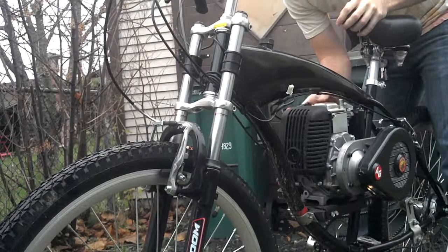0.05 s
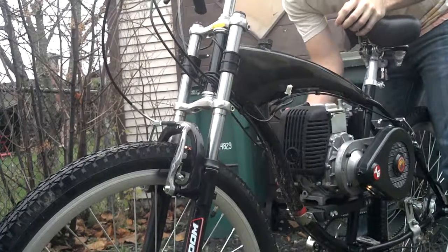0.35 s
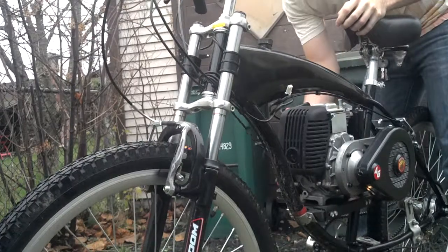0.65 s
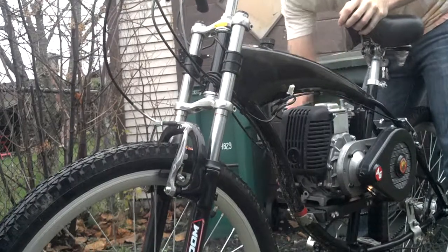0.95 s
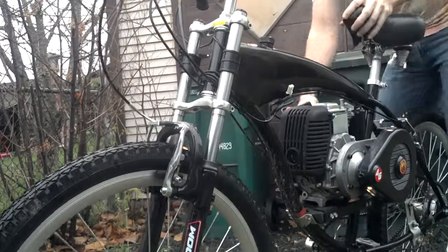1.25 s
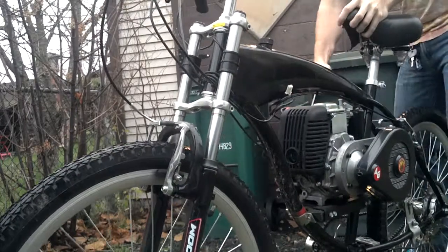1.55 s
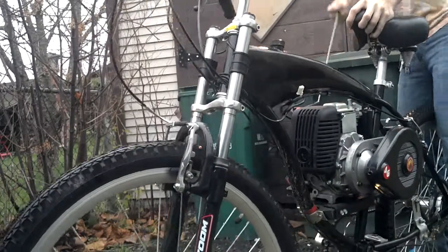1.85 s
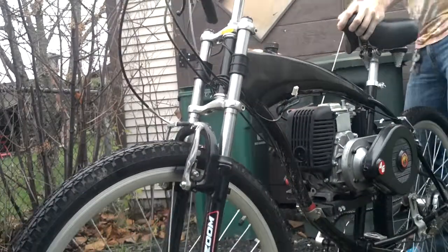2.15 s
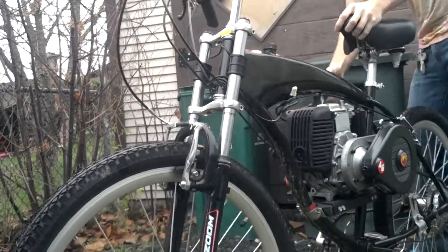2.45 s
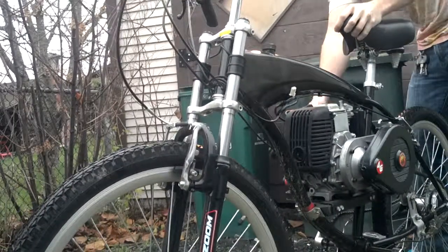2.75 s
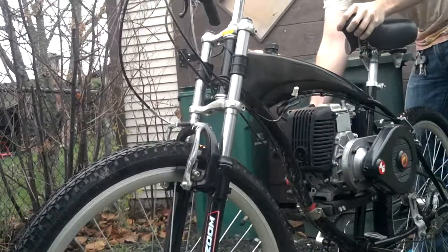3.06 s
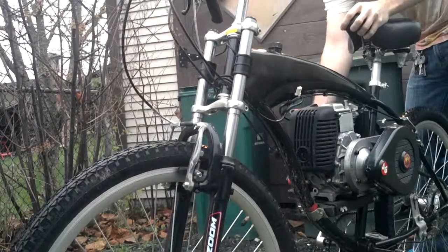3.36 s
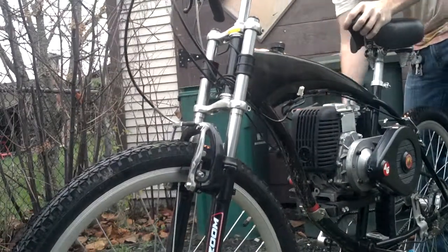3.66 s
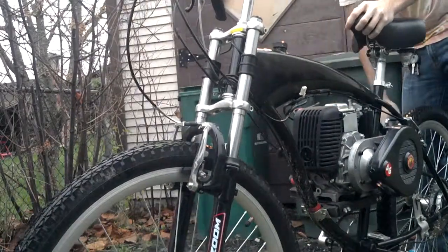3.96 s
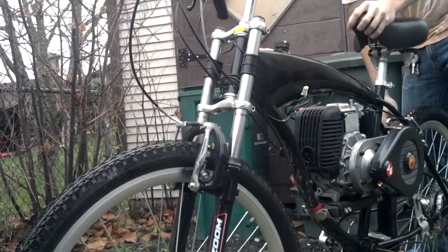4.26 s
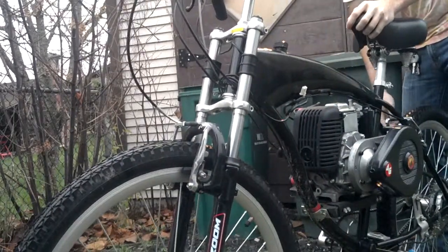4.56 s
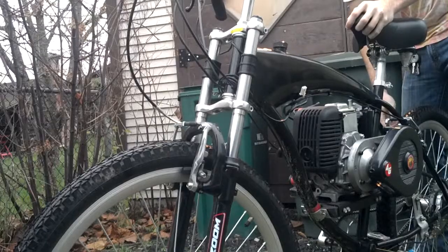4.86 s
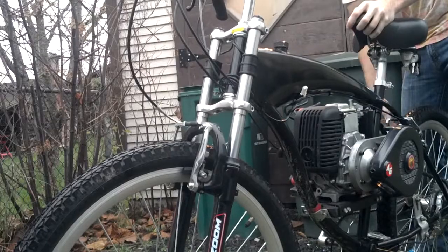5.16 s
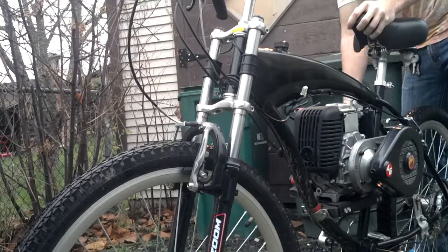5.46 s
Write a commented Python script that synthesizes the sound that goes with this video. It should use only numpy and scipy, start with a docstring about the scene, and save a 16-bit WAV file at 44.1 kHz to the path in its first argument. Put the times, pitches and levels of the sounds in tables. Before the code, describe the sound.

In a quiet yard with a distant motor hum, a hand makes a few light clicks on a motorized bicycle. The starter cord scrapes and whirrs out, and the small four-stroke engine catches with a sharp kick. Close by, it putters with ticking valves and a metallic clatter, revs up, then slows almost to a stall with sharp clacks before picking up weakly.

```python
"""A hand clicks at the controls and takes up a starter cord, over a quiet yard and a far machine's hum.
The cord whirrs out and a small four-stroke bicycle engine catches, revs up, nearly stalls with sharp
clacks and catches again. Each cycle puffs gas through the muffler and pipe, knocks the crankcase and
clicks two valves against the finned head, over the clatter of loose parts."""
import sys
import numpy as np
from scipy import signal
from scipy.fft import rfft, irfft, next_fast_len
from scipy.io import wavfile
from scipy.ndimage import uniform_filter1d

SR = 44100
rng = np.random.default_rng(int(sys.argv[2]) if len(sys.argv) > 2 else 0)


def put_to_file(sound):
    """Save the sound as 16-bit audio at rate SR, in the file named by the first command-line argument."""
    columns = np.atleast_2d(sound).T  # one column per channel
    safe = np.clip(columns, -1, 1)
    whole_steps = np.round(safe * 32767)
    wavfile.write(sys.argv[1], SR, whole_steps.astype(np.int16))


N = 242991
TIME = np.arange(N) / SR
FFT_SIZE = next_fast_len(N + 8192, real=True)
FREQ = np.maximum(np.arange(FFT_SIZE // 2 + 1) * SR / FFT_SIZE, 1)

# engine speed: t/s, four-stroke cycle rate/Hz
SPEED = [(1.9, 22.44), (2.05, 10.06), (2.16, 20.66), (2.41, 25.47), (2.81, 22.22), (3.28, 22.73),
         (3.72, 27.46), (4.32, 29.22), (4.71, 26.1), (5.16, 9.24), (5.35, 15.97), (5.51, 13.52)]
# throttle moves: t/s, opening/0-1
THROTTLE = [(2.16, 0.07), (2.46, 0.32), (2.72, 0.35), (3.28, 0.7), (4.58, 0.83), (4.78, 0.3), (4.92, 0.3),
            (5.02, 0.34), (5.14, 0.3), (5.29, 0.97), (5.43, .75), (5.51, 0.5)]
# muffler response with hot gas: f/Hz, gain/dB
MUFFLER_EQ = [(30, -51), (58, -24), (72, -47), (88, -9.5), (106, -12.5), (122, -1.5), (139, 2.5),
              (152, -1.5), (174, -22), (205, -12.5), (260, -28), (600, -50)]
# exhaust pipe resonances: f/Hz, width/Hz, gain/dB
PIPE_MODES = [(221.6, 23, 0.5), (249.3, 22, 5), (329, 71, 0.5), (389.5, 9.9, 6.5), (552, 42, -0.5),
              (848, 71, 1)]
# the bare pressure crack of a puff: f/Hz, gain/dB
POP_EQ = [(50, -51), (130, -33), (250, 8.5), (900, -4), (2000, -13), (4500, -18), (12000, -33)]
# piston, crank and gears hitting the crankcase: position/cycles, relative level/dB
KNOCKS = [(.03, 0), (.23, -9), (.37, -2.5), (.76, -9), (.87, -1.5), (.96, -8)]
# crankcase and cover resonances: f/Hz, width/Hz, gain/dB
CASING_MODES = [(784, 7.3, -3), (834, 15, 0.5), (878, 25, 0), (995, 33, -4), (1135, 33, -4.5),
                (1178, 36, 4), (1252, 38, 0.5), (1331, 84, 7.5), (1371, 22, 7.5), (1548, 9.3, -2.5),
                (1830, 470, -2)]
# broad tone of metal contacts: f/Hz, gain/dB
METAL_EQ = [(150, -58), (420, 7), (1200, 1), (1630, -5.5), (2200, 4), (2700, -4), (3300, -3), (4600, -2),
            (7000, -4.5), (8700, -11), (11000, -15.5), (12000, -18), (15500, -23)]
# light taps of rockers and push rods: position/cycles, level against the exhaust valve/dB
TAPS = [(.1, -7), (.18, -9), (.345, -6), (.48, -9), (.67, -6), (.83, -8), (.92, -10)]
# cylinder head and cooling fin resonances: f/Hz, width/Hz, gain/dB
HEAD_MODES = [(3150, 25, 0), (3222, 36, 11), (3497, 97, -1), (3750, 110, -3), (4230, 70, -6),
              (4440, 130, -8), (6185, 35, -1), (6440, 55, 5), (6530, 40, 2), (6730, 36, 3), (7000, 120, -5)]
# harmonics that sing on a resonance: multiple of the cycle rate, f/Hz, width/Hz, level/dB, roughness/0-1
SINGING = [(12, 335, 60, -38, .18), (15, 385, 40, -51, .4), (16, 390, 35, -46, .3), (17, 388, 30, -45, .3),
           (28, 764, 16, -40, .35), (28, 808, 22, -37, .35), (31, 890, 30, -41, .4),
           (40, 1152, 44, -32.5, .6), (47, 1360, 30, -36, .7)]
# valve snaps and exhaust spits: t/s, relative rattle level/dB, rattle t60/s, snap/dB, cover ring/dB
CLACKS = [(4.814, -28, .04, -40, -38), (4.862, -30, .03, -42, -29), (4.913, -31, .03, -42, -34),
          (4.972, -25, .035, -32, -36), (5.038, -23, .04, -32, -35), (5.121, -25.5, .03, -34, -38),
          (5.192, -23, .05, -27, -21), (5.22, -28, .035, -41, -29), (5.262, -33, .03, -44, -27),
          (5.277, -23, .045, -29, -31), (5.298, -24, .035, -38, -37), (5.343, -28, .05, -36, -28),
          (5.408, -27, .06, -36, -32), (5.428, -24, .035, -40, -38), (5.498, -23.5, .04, -31, -33)]
# bright rattle of a clack: f/Hz, gain/dB
RATTLE_EQ = [(1000, -27), (3000, -20), (6500, 21), (9000, 5), (12000, -19), (15500, -7)]
# the snap at the front of a hit: f/Hz, gain/dB
SNAP_EQ = [(300, -25), (1200, -3), (3500, 1), (9000, -3), (15500, -7)]
# hand on the controls, valve clicks and a knock as the engine is cranked, a kick as it catches:
# t/s, relative level/dB, hardness/0-1, snap/dB, t60/s, ring f/Hz, ring gain/dB
TOUCHES = [(0.374, -34.5, 0.03, -64, 0.03, 1240, -15), (0.477, -31.5, 0.2, -53, .045, 746, -10),
           (0.859, -28, 0.46, -58, 0.062, 1220, -15), (0.87, -28.5, 0.72, -52, 0.12, 3930, -12),
           (.935, -33, 0.32, -62, 0.036, 1230, -12.5), (0.954, -38.5, 0.53, -62, 0.12, 3970, -14),
           (1.159, -39, 0.5, -58, 0.1, 6550, -12.5), (1.303, -21.5, 0.22, -41, 0.09, 6500, -22),
           (1.458, -51, 0.86, -64, 0.24, 4360, -2), (1.8165, -32, 0.6, -35, 0.13, 4150, -17),
           (1.969, -30, .5, -33, .04, 6500, -8), (2.049, -27, .45, -33, .04, 6500, -8),
           (2.014, -27, .15, -44, .04, 1380, -6), (2.1005, -11, 0.5, -13.5, 0.035, 3440, -11)]
# tugs that draw slack cord off the reel: middle t/s, length/s, relative level/dB
TUGS = [(1.42, 0.12, -55), (1.51, 0.16, -55), (1.605, 0.13, -48)]
# the far machine's lasting partials: harmonic number, relative level/dB
HUM_PARTIALS = [(1, -20), (2, 4.5), (3, 6.5), (5, -8.5), (6, -9.5)]
# outdoor ambience: f/Hz, gain/dB
YARD_EQ = [(30, -39), (70, -10.5), (150, 3), (220, 2), (340, -3), (720, 1.5), (1250, -7), (1700, -17),
           (3500, -21.5), (6500, -26), (9000, -29.5), (15500, -31)]

# faders of the engine's parts: dB at cruise and half throttle, dB per doubling of speed,
# dB from shut to open throttle, dB added when racing
BOOM_FADER, BARK_FADER = (-30.5, 7.5, 7.5, -6), (-31, 11, 5.5, -3.5)
KNOCK_FADER, VALVE_FADER = (-25.5, -1.5, 3.5, 6), (-31, 5, 6, -1.4)
CRUISE_HZ, FIRM_FROM_HZ, RACING_FROM_HZ, RACING_HZ = 24.16, 24.6, 25.5, 30  # cycle rates
COOL_THROTTLE, HOT_THROTTLE, COOL_PITCH = 0.295, 0.39, 0.952  # cooler gas rings the muffler lower
PULL_START_S, PULL_PEAK_S, PULL_END_S = 1.6, 2.16, 2.18
SWELL_DB_PER_S, SWELL_END_S = 97, 2.039  # the engine fades in during the pull
TOUCH_RISE_S, SNAP_RISE_S = 0.00052, 0.0002


def exhaust(cycle, speed, throttle, boom_db, bark_db):
    """Blowdown booms in the muffler; with the piston's push it barks in the pipe, pops and hisses."""
    blowdown = blows(cycle, at=.05, scatter_db=.8, jitter_s=.00006)
    push = blows(cycle, at=.383, scatter_db=1.4, jitter_s=.0001)
    heat = np.interp(throttle, [COOL_THROTTLE, HOT_THROTTLE], [0, 1])
    cool_eq = [(hz * COOL_PITCH, db) for hz, db in MUFFLER_EQ]
    hot = equalise(blowdown * heat, MUFFLER_EQ, size=8192)
    cool = equalise(blowdown * (1 - heat), cool_eq, size=8192)
    boom = unit(band(hot + cool, 162, 140)) * undb(boom_db - 1)
    bark = unit(band(ring(-push - blowdown, PIPE_MODES), 265, 380)) * undb(bark_db - 5)
    pop = -unit(equalise(push + 0.38 * blowdown, POP_EQ)) * undb(bark_db - 9) * firmness(speed) ** 2
    rush = blows(cycle, at=.345, scatter_db=1.5, jitter_s=.0001)
    hiss = chatter(.6 * blowdown + rush, decay_s=.008, tail_s=.03, tail_db=-11, fresh=.18)
    gas_eq = [(120, -26), (280, -2.5), (520, -8), (820, -4), (1300, -27.5), (5000, -99)]
    gas = unit(equalise(hiss, gas_eq)) * undb(bark_db - 6)
    scattered = unit(equalise(hiss, MUFFLER_EQ)) * undb(boom_db - 12.5)  # boom thrown back by the yard
    return lag_lows(boom) + lag_lows(bark, lag_rad=2.16, corner_hz=306) + pop + spread(gas) + scattered


def casing(cycle, speed, db):
    """Combustion thumps the block; piston, crank and gears knock the crankcase, softly near a stall."""
    hits = pattern(cycle, KNOCKS, scatter_db=1.6, jitter_s=.00006) * firmness(speed) ** 1.5
    knocks = chatter(hits, decay_s=.005, tail_s=.025, tail_db=-11, fresh=.14)
    loose = chatter(clatter(cycle, per_cycle=24), decay_s=.0025, tail_s=.025, tail_db=-9, fresh=1)
    drive = knocks + undb(-8.5) * loose
    firing = blows(cycle, at=-.11, scatter_db=1.8, jitter_s=.0001) * firmness(speed)
    combustion = chatter(firing, decay_s=.005, tail_s=.02, tail_db=-14, fresh=.15)
    thump = undb(db - 18) * unit(band(band(combustion, 770, 360), 740, 520))
    clank = undb(db - 8) * unit(band(ring(drive, CASING_MODES), 800, 3000))
    contact = undb(db - 10) * unit(equalise(drive, METAL_EQ))
    return thump + clank + contact


def valves(cycle, speed, db):
    """The exhaust valve snaps shut and rings the finned head; inlet and rockers soften at low speed."""
    outlet = blows(cycle, at=.38, scatter_db=1.5, jitter_s=.0001)
    inlet = blows(cycle, at=.7, scatter_db=2, jitter_s=.0002)
    vigour = np.clip(speed / 25, 0, 1) ** 2
    taps = pattern(cycle, TAPS, scatter_db=1.6, jitter_s=.00015)
    loose = chatter(clatter(cycle, per_cycle=20), decay_s=.0013, tail_s=.015, tail_db=-13, fresh=1)
    loose *= undb(-6 + 1.5 * np.log2(speed / CRUISE_HZ))
    clicks = chatter(outlet + vigour * taps, decay_s=.0037, tail_s=.025, tail_db=-14, fresh=.3) + loose
    seating = chatter(vigour * inlet + undb(-2) * outlet, decay_s=.0024, tail_s=.02, tail_db=-18, fresh=.4)
    tick = undb(db - 8) * unit(band(band(seating, 6450, 730), 6700, 1750))
    fins = undb(db - 4) * unit(ring(clicks, HEAD_MODES))
    contact = undb(db - 5) * unit(band(equalise(clicks, METAL_EQ), 5550, 4300))
    return tick + fins + contact


def singing(cycle, speed):
    """Harmonics swell as they cross a resonance: clear tones in the pipe, rattling ones in the casing."""
    tones = 0
    for multiple, hz, width_hz, db, roughness in SINGING:
        closeness = np.exp(-2 * ((multiple * speed - hz) / width_hz) ** 2)
        gain = closeness * undb(db + 4 * roughness * wander(90))
        tones += gain * np.sin(2 * np.pi * multiple * cycle + roughness * wander(45))
    return np.sqrt(2) * tones * (TIME > PULL_END_S)


def clacks():
    """Valves snap and the exhaust spits as the slow engine jerks through its cycles; the cover rings."""
    rattle_env = sum(strike(s, db - 5, SNAP_RISE_S, t60) for s, db, t60, _, _ in CLACKS)
    cover_env = sum(strike(s, db, TOUCH_RISE_S, t60=.037) for s, *_, db in CLACKS)
    cover = unit(band(band(noise(), 1365, 73), 1365, 250)) * cover_env
    rattle = unit(equalise(noise(), RATTLE_EQ)) * rattle_env
    return rattle + cover + snaps([(s, db) for s, _, _, db, _ in CLACKS])


def starter_whirr(knock_db, valve_db):
    """The cord whirrs off its reel, loudest at the fastest point of the pull."""
    pull = np.interp(TIME, [PULL_START_S, PULL_PEAK_S, PULL_END_S], [0, 1, 0])
    body = undb(knock_db - 6.5) * unit(ring(noise(), CASING_MODES))
    sizzle = undb(valve_db + 1.5) * unit(equalise(noise(), METAL_EQ))
    return pull * (body + sizzle)


def touches():
    """Controls tap, the cranked engine clicks, knocks and kicks; harder hits have more tick, less thud."""
    bump = strike(1.651, db=-27.5, rise_s=.016, t60=.13)  # the handle bumps dully as the cord comes taut
    thud_env, clank_env, tick_env = bump, undb(-2.5) * bump, undb(-7.5) * bump
    rings = 0
    for s, db, hardness, _, t60, ring_hz, ring_db in TOUCHES:
        hit = strike(s, db, TOUCH_RISE_S, t60)
        width_hz = .068 * ring_hz
        rings += hit * undb(ring_db) * unit(band(band(noise(), ring_hz, width_hz), ring_hz, 2 * width_hz))
        thud_env = thud_env + hit * undb(-22 * hardness)
        clank_env = clank_env + hit * undb(-5 + 14 * hardness)
        tick_env = tick_env + hit * undb(-25.5 + 37.5 * hardness)
    thud = unit(band(band(noise(), 390, 330), 540, 500)) * thud_env * undb(-10)
    clank = unit(ring(noise(), CASING_MODES)) * clank_env * undb(-18.5)
    tick_eq = [(300, -16), (900, -7), (2200, 10), (3700, 5), (5500, 3.5), (7000, 3),
               (10000, -10.5), (15500, -26)]
    tick = unit(equalise(noise(), tick_eq)) * tick_env * undb(-8)
    snap = snaps([(s, snap_db) for s, _, _, snap_db, *_ in TOUCHES])
    low_cut = signal.butter(3, 220, "high", fs=SR, output="sos")  # small parts radiate no deep bass
    return signal.sosfilt(low_cut, thud + clank + tick + snap + rings)


def snaps(events):
    """The first bright instant of a hit, for each t/s, level/dB."""
    envelope = sum(strike(s, db, SNAP_RISE_S, t60=.014) for s, db in events)
    return unit(equalise(noise(), SNAP_EQ)) * envelope


def cord(rub_from_s=1.4):
    """The reel squeaks and scrapes at each tug and rubs harder as the spring winds up."""
    tugs = sum(undb(db) * np.cos(np.pi * np.clip((TIME - s) / length, -.5, .5)) for s, length, db in TUGS)
    squeak = unit(band(band(noise(), 1210, 64), 1230, 150)) * tugs * undb(-3.5 + wander(90))
    rub = unit(equalise(noise(), METAL_EQ)) * undb(-57 + 4 * (TIME - rub_from_s) + 2 * wander(65.3))
    scrape = unit(ring(noise(), CASING_MODES)) * tugs * undb(-13 + 2.6 * wander(68.7))
    return squeak + scrape + rub * (TIME > rub_from_s) * (TIME < SWELL_END_S)


def far_machine():
    """A distant motor hums, slowly sagging in pitch; moving air makes its partials swell and fade."""
    hz = (130.5 - .6 * TIME) * (1 + .00073 * wander(11))
    phase = 2 * np.pi * np.cumsum(hz) / SR
    hum = sum(np.sin(k * phase) * undb(-60 + db + 2.3 * wander(4.5)) for k, db in HUM_PARTIALS)
    fourth_db = np.maximum(-48.5 - 35 * TIME, -67.5)  # this partial soon fades to a faint trace
    return np.sqrt(2) * (hum + np.sin(4 * phase) * undb(fourth_db))


def yard():
    """A bed of soft town noise from all sides, with three wavering drones in it."""
    air = unit(equalise(noise(), YARD_EQ)) * undb(-54.5 + 1.1 * wander(4.36))
    drones = unit(ring(noise(), [(157.2, 3, -6.5), (319, 8.3, -9), (723, 4.4, -10.5)])) * undb(-61.5)
    return air + drones


def fader_db(fader, speed, throttle):
    """Level of an engine part: it rides speed and throttle, shifts when racing and swells in at first."""
    cruise_db, doubling_db, throttle_db, racing_db = fader
    running_db = cruise_db + doubling_db * np.log2(speed / CRUISE_HZ) + throttle_db * (throttle - .5)
    racing = np.interp(speed, [RACING_FROM_HZ, RACING_HZ], [0, 1])
    swell_db = SWELL_DB_PER_S * np.minimum(TIME - SWELL_END_S, 0)
    return running_db + racing_db * racing + swell_db


def firmness(speed):
    """How hard the firings strike, 0-1: a slow engine hits softly."""
    return np.clip(speed / FIRM_FROM_HZ, 0, 1)


def blows(cycle, at, scatter_db, jitter_s):
    """One impulse a cycle, at position `at`; slow cycles carry the same power in fewer blows."""
    turns = np.arange(1, int(cycle[-1]) + 1) + at
    turns = turns[turns < cycle[-1]]
    timing, strength = rng.standard_normal((len(turns), 2)).T
    where = np.clip(np.searchsorted(cycle, turns) + (jitter_s * SR * timing).astype(int), 0, N - 1)
    rate_hz = np.maximum(np.gradient(cycle)[where] * SR, 1)
    impulses = np.zeros(N)
    impulses[where] = undb(scatter_db * strength) / np.sqrt(rate_hz)
    return impulses


def pattern(cycle, table, scatter_db, jitter_s):
    """A rhythm of blows, cycle after cycle."""
    return sum(undb(db) * blows(cycle, at, scatter_db, jitter_s) for at, db in table)


def clatter(cycle, per_cycle, scatter_db=3):
    """Loose parts knock at random, more often as the engine turns faster."""
    hits = rng.random(N) < per_cycle * np.gradient(cycle)
    return hits * undb(scatter_db * np.clip(rng.standard_normal(N), -2, 2))


def chatter(impulses, decay_s, tail_s, tail_db, fresh):
    """Each blow becomes a buzz with a tail; the share `fresh` of its power is new, the rest repeats."""
    t = TIME[:SR // 8]
    power = np.exp(-2 * t / decay_s) + undb(2 * tail_db) * np.exp(-2 * t / tail_s)
    buzz = noise()[:, :len(t)] * np.sqrt(power)
    repeated = signal.fftconvolve(impulses[None], buzz, axes=1)[:, :N]
    new = noise() * np.sqrt(np.abs(signal.fftconvolve(impulses ** 2, power)[:N]))
    return np.sqrt(1 - fresh) * unit(repeated) + np.sqrt(fresh) * unit(new)


def strike(s, db, rise_s, t60):
    """Envelope of one contact: a quick rise to its peak at s, then 60 dB down in t60 seconds."""
    age = TIME - s
    return undb(db - 60 * np.maximum(age, 0) / t60) * np.exp(np.minimum(age, 0) / rise_s)


def ring(x, modes):
    """A body of several resonances: f/Hz, width/Hz, gain/dB."""
    return sum(undb(db) * band(x, hz, width) for hz, width, db in modes)


def band(x, hz, width_hz):
    """One resonance, gain 1 at its centre."""
    return signal.lfilter(*signal.iirpeak(hz, hz / width_hz, fs=SR), x + 1e-18)


def equalise(x, points, size=2048):
    """Minimum-phase EQ through points of f/Hz, gain/dB; nothing rings ahead of an attack."""
    hz, db = np.transpose(points)
    grid = np.maximum(np.arange(size // 2 + 1) * SR / size, 1)
    cepstrum = irfft(np.log(undb(np.interp(np.log(grid), np.log(hz), db))))
    cepstrum[1:size // 2] *= 2
    cepstrum[size // 2 + 1:] = 0
    response = irfft(np.exp(rfft(cepstrum)))
    return signal.fftconvolve(np.atleast_2d(x), response[None], axes=1)[:, :N]


def spread(pair, alike_hz=1100):
    """Left and right share most of the lows; the highs differ and are weaker on the left."""
    direct, other = rfft(pair, FFT_SIZE)
    alike = 1 / np.sqrt(1 + (FREQ / alike_hz) ** 4)
    left = alike * (direct + undb(-9) * other) + np.sqrt(1 - alike ** 2) * undb(-6) * other
    return irfft(np.array([left, direct]), FFT_SIZE)[:, :N]


def lag_lows(x, lag_rad=1.0, corner_hz=340):
    """Low sound wraps round the frame and reaches the right side later than the left."""
    lag = lag_rad / (1 + (FREQ / corner_hz) ** 4)
    turn = np.exp([.5j * lag, -.5j * lag])
    return irfft(rfft(x, FFT_SIZE) * turn, FFT_SIZE)[:, :N]


def wander(rate_hz):
    """A smooth random drift with a spread near 1."""
    hold = int(SR / rate_hz)
    steps = np.repeat(rng.standard_normal(N // hold + 1), hold)
    return 1.3 * uniform_filter1d(uniform_filter1d(steps, hold), hold)[:N]


def noise():
    """Two unrelated white noises."""
    return rng.standard_normal((2, N))


def undb(db):
    """Decibels to gain."""
    return 10 ** (np.asarray(db) / 20)


def unit(x):
    """Scale to rms 1."""
    return x / np.sqrt(np.mean(x ** 2))


def scene():
    """Speed and throttle play the engine from the pull on, with handling in front and the yard behind."""
    speed = np.interp(TIME, *np.transpose(SPEED))
    throttle = np.interp(TIME, *np.transpose(THROTTLE))
    cycle = np.cumsum(speed * (TIME > SPEED[0][0])) / SR  # cycles turned so far
    faders = BOOM_FADER, BARK_FADER, KNOCK_FADER, VALVE_FADER
    boom_db, bark_db, knock_db, valve_db = (fader_db(fader, speed, throttle) for fader in faders)
    whirr = starter_whirr(knock_db, valve_db)
    mechanics = casing(cycle, speed, knock_db) + valves(cycle, speed, valve_db) + clacks()
    metal = mechanics + whirr + touches() + cord()
    voice = exhaust(cycle, speed, throttle, boom_db, bark_db) + lag_lows(singing(cycle, speed))
    background = yard() + lag_lows(far_machine(), lag_rad=1.07, corner_hz=700)
    return voice + spread(metal) + background


def record(dry, cross_delay_s=17 / SR, ceiling=.95, top_hz=15650):
    """Above the bass each side subtracts the other, delayed, for width; then soft clip and high cut."""
    spectrum = rfft(dry, FFT_SIZE)
    crossfeed = np.clip((FREQ - 600) / 700, 0, 1) * np.exp(-2j * np.pi * FREQ * cross_delay_s)
    wide = irfft(spectrum - crossfeed * spectrum[::-1], FFT_SIZE)[:, :N]
    rounded = ceiling * np.tanh(wide / ceiling)
    return signal.sosfilt(signal.ellip(10, .2, 80, top_hz, fs=SR, output="sos"), rounded)


dry = scene()
out = record(dry)
put_to_file(out)
```